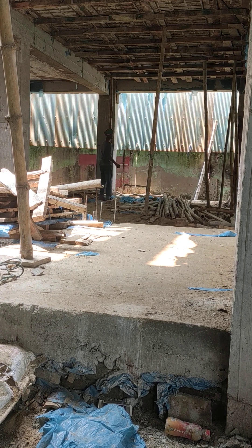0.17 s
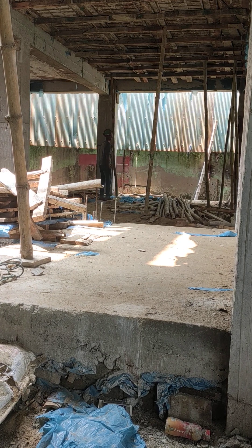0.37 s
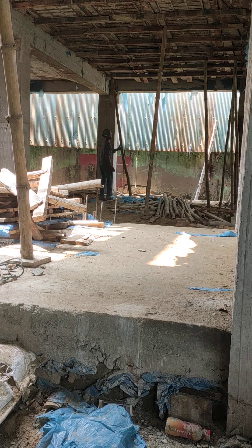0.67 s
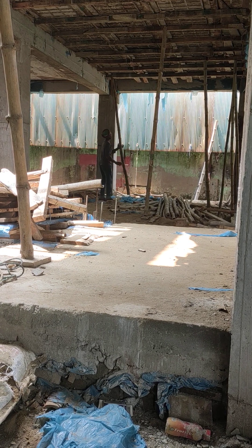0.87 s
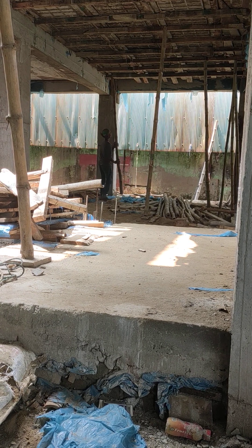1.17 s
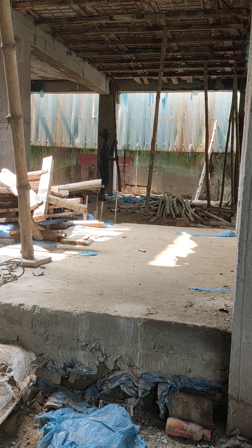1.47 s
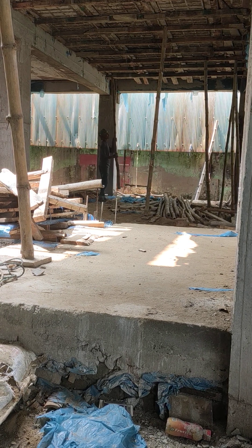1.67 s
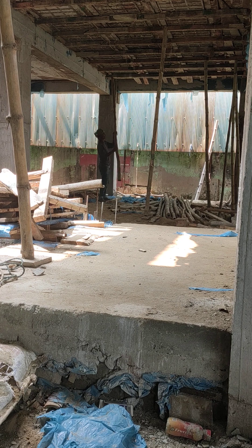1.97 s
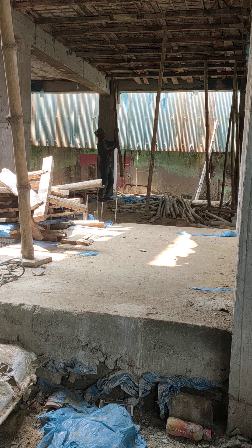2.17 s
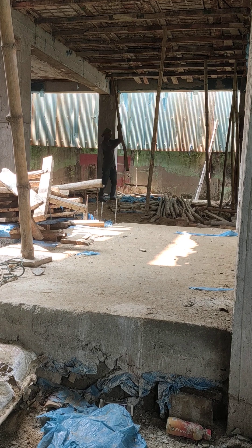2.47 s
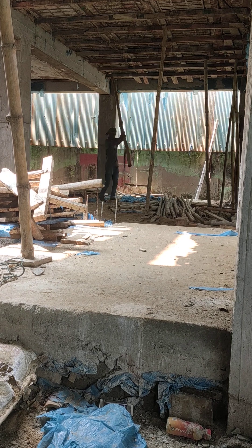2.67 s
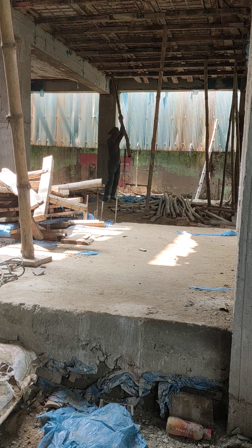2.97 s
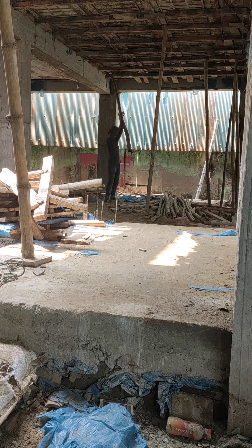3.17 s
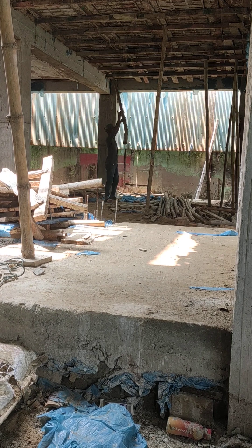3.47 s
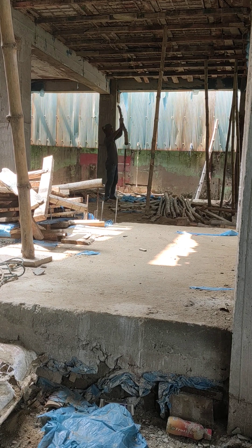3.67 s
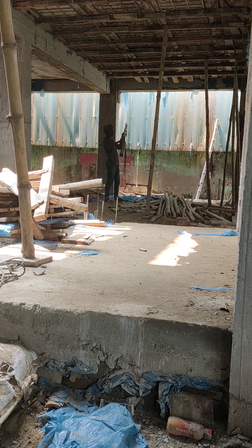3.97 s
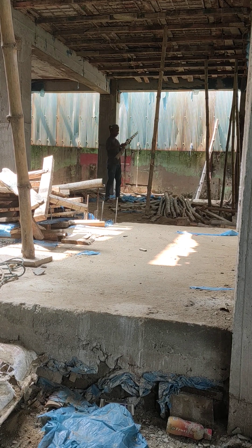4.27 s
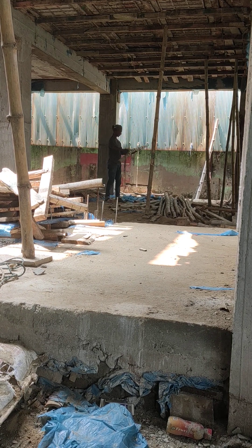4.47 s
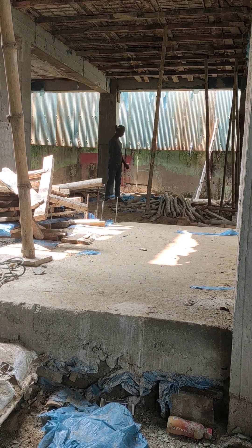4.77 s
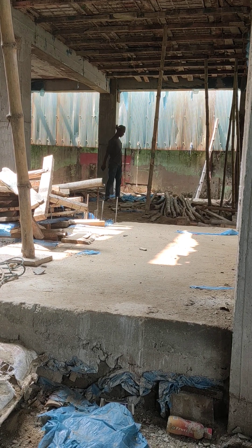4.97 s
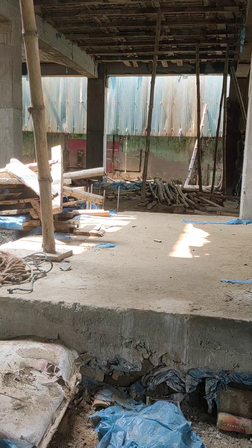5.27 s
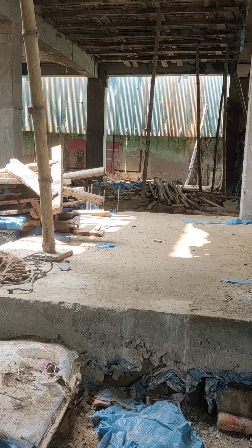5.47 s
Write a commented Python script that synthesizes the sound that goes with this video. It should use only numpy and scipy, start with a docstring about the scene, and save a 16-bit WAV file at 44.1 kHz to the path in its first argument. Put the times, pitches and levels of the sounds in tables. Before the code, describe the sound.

A pole rams wooden shuttering about twice a second in an echoing concrete shell, until a board works loose and clatters onto the floor.

```python
"""In a bare building a pole rams timber shuttering under a slab, twice a second: deck thumps, board rings, wood cracks.
A beam shades the blows, so their treble arrives only by echo; light taps and rebounds tick in between.
After six blows a board comes loose and knocks ever louder, then falls and clatters on the concrete.
The sound cuts out briefly in the crash's tail, which resumes for an instant; then only the site noise goes on,
with one low swell and a faint clunk. Bodies are dying sines, contacts shaped pulses, the hall decaying noise."""
import sys
import numpy as np
from scipy import signal
from scipy.fft import rfft, irfft
from scipy.io import wavfile

SR = 44100
rng = np.random.default_rng(int(sys.argv[2]) if len(sys.argv) > 2 else 0)


def wav_record(signal):
    """Record a signal, one row per channel, as 16-bit PCM in the file named by sys.argv[1]."""
    frames = np.transpose(np.atleast_2d(signal))
    bounded = np.clip(frames, -1, 1)
    # unit amplitude maps onto the largest positive 16-bit level
    quanta = np.round(bounded * 32767).astype(np.int16)
    wavfile.write(sys.argv[1], SR, quanta)


N = 247842
LEAD = SR // 2  # samples of run-in before time zero
TAIL_T = np.arange(3 * SR // 2) / SR  # s
HIT_T = TAIL_T[:SR // 5]  # s
LOOSE_AT_S = 3.0  # the board comes loose

# Pole blows. Each row: start in seconds, force in dB, crack tilt in dB/octave (0 square on, lower when
# glancing), favoured board mode in Hz.
BLOWS = [(-0.26, -9, -2.5, 824), (0.2246, -9, -3.5, 554), (0.7126, -6.5, 0.5, 1370),
         (1.2082, -6.5, -4, 1340), (1.6958, -5.5, -2.5, 1420), (2.1849, -4.5, 0, 1430),
         (2.665, -4.5, -1, 1460), (3.1368, -4, -3.5, 524), (3.6279, -4, 1.5, 1016), (4.097, -4.5, -1, 1020),
         (4.6225, -5.5, -6, 1020)]
# Spectrum of wood cracking on wood. Each row: frequency in Hz, level in dB.
CRACK = [(200, -19.5), (600, -1.5), (900, -1), (1300, 6.5), (2000, 0), (2900, 5), (4200, 3.5), (6000, 2.5),
         (8500, 4), (11000, -2), (13500, -4.5), (16000, -8.5)]


def amp(db):
    """Decibels to gain."""
    return 10 ** (np.asarray(db) / 20)


def unit(x):
    """Scales to energy one per channel, averaged over the channels."""
    return x / np.sqrt(np.mean(np.sum(x ** 2, -1)) + 1e-20)


def read(points, hz):
    """Joins table rows by straight lines on a log-frequency axis."""
    f, value = np.transpose(points)
    return np.interp(np.log(hz + 1), np.log(f + 1), value)


def add(track, start_s, sound):
    """Mixes a sound into a track that begins with the run-in."""
    part = track[max(round(start_s * SR) + LEAD, 0):][:len(sound)]
    part += sound[:len(part)]


def lowpass(x, hz, order=2):
    """Causal Butterworth low-pass."""
    sos = signal.butter(order, min(hz, SR / 2.1), fs=SR, output="sos")
    return signal.sosfilt(sos, x)


def pulse(spectrum, tilt_db_per_octave=0, size=4096):
    """Minimum-phase pulse of energy one with the given spectrum, tilted above the 64th bin."""
    hz = abs(np.fft.fftfreq(size, 1 / SR))
    octaves = np.log2(np.maximum(hz, SR / size * 64))
    log_gain = np.log(amp(read(spectrum, hz) + tilt_db_per_octave * octaves))
    # the Hilbert transform of the log gain gives the causal phase
    minimum_phase = np.exp(np.conj(signal.hilbert(log_gain)))
    return unit(np.fft.ifft(minimum_phase).real)


def ring(modes, tilt_db_per_octave=0, t=HIT_T):
    """Dying sines of a struck body, energy one; a harder contact tilts them upward."""
    total = np.zeros(len(t))
    for k, (hz, db, t60_s) in enumerate(modes):
        sine = unit(amp(-60 * t / t60_s) * np.sin(2 * np.pi * hz * t))
        total += (-1) ** k * amp(db + tilt_db_per_octave * np.log2(hz)) * sine
    return unit(total)


def diffuse(size, spacing_m=0.19):
    """Noise from all directions at two spaced microphones: alike in the bass, unrelated in the treble."""
    a, b = rfft(rng.standard_normal((2, size)))
    same = np.sinc(2 * np.fft.rfftfreq(size, 1 / SR) * spacing_m / 343)  # sound travels 343 m/s
    return irfft([a, same * a + np.sqrt(1 - same ** 2) * b], size)


def hall(first_s, build_s, echoes=(), scatter_s=0.0036):
    """Diffuse tail swelling from the first reflection, energy one; rough walls smear each strong echo."""
    # Each row: frequency in Hz, t60 in seconds.
    decay_times = [(80, 1.5), (260, 0.79), (700, 0.7), (1840, .62), (4500, 0.55), (6500, 0.44),
                   (10000, 0.44), (15000, 0.29)]
    t = TAIL_T
    hz, at_s, z = signal.stft(diffuse(len(t)), SR, nperseg=1024)
    decay = amp(-60 * at_s / read(decay_times, hz)[:, None])
    # even out each band's chance energy in the random noise
    weight = (decay * (at_s > first_s)) ** 2
    band_energy = (abs(z) ** 2 * weight).sum((0, 2)) / weight.sum(1)
    z /= np.sqrt(band_energy)[:, None]
    noise = signal.istft(z * decay, SR, nperseg=1024)[1][:, :len(t)]
    tail = unit(noise * np.clip((t - first_s) / build_s, 0, 1))
    for delay_s, db, lowest_hz in echoes:
        burst = unit(diffuse(len(t)) * (t > delay_s) * np.exp(-abs(t - delay_s) / scatter_s))
        tail += amp(db) * (burst - lowpass(burst, lowest_hz, order=1))
    return unit(tail)


def heard(track, response):
    """Convolves a track with a one- or two-channel response and drops the run-in."""
    return signal.fftconvolve(track[None], response, axes=1)[:, LEAD:LEAD + N]


def background(air_db=-47):
    """Dull steady noise of the open site, with one low swell."""
    # Each row: frequency in Hz, density in dB per Hz.
    air_spectrum = [(20, -6), (60, -6.5), (150, -16), (300, -21.5), (600, -24.5), (1200, -28.5),
                    (2500, -35.5), (5000, -41.5), (10000, -47), (15000, -50.5)]
    swell_at_s, rise_s, fall_s = 5.27, 0.096, 0.21  # linear rise, exponential fall
    swell_db, swell_top_hz = -40.5, 333
    t, hz = np.arange(N) / SR - swell_at_s, np.fft.rfftfreq(N, 1 / SR)
    shaped = irfft(rfft(diffuse(N)) * amp(read(air_spectrum, hz)), N)
    envelope = np.clip(t / rise_s, 0, 1) * np.exp(-np.maximum(t - rise_s, 0) / fall_s)
    swell = envelope * unit(lowpass(diffuse(N), swell_top_hz))
    return (amp(air_db) * unit(shaped) + amp(swell_db) * swell) * np.sqrt(N)  # energy to power


def scrap(start_s=5.31, level_db=-11.5, hall_db=-1.0):
    """A faint clunk: modes of a small piece of scrap nudged near the microphones."""
    # Each row: frequency in Hz, level in dB, t60 in seconds.
    scrap_modes = [(74, 0, 0.18), (676, -8, .16), (965, -21, .04), (1440, -22, 0.067), (2180, -22, .12)]
    track = np.zeros(N + LEAD)
    add(track, start_s, amp(level_db) * ring(scrap_modes))
    return track[LEAD:] + amp(hall_db) * heard(track, hall(first_s=.002, build_s=0.0067))


def rebounds(tick, tick_db):
    """The tight board throws the pole back for a second touch; a glancing blow throws it less."""
    delay_s, rebound_db, tilt_db_per_octave = 0.108, -6.5, -3.5  # dB against the force
    glance = 4.8  # dB per dB/octave of the blow's tilt
    for start_s, force_db, blow_tilt, _ in BLOWS:
        if start_s < LOOSE_AT_S:
            level_db = tick_db + force_db + rebound_db + glance * blow_tilt
            add(tick, start_s + delay_s, amp(level_db) * pulse(CRACK, tilt_db_per_octave))


def taps(ring_db=12, tick_db=7, ring_direct_db=-4, tick_direct_db=-20):
    """Light contacts of pole and loose fittings, and rebounds, in plain view: wood tick plus pole ring."""
    # Each row: start in seconds, tick in dB, tick tilt in dB/octave.
    contacts = [(1.644, -24.5, 10.5), (2.027, -28.5, 4.5), (2.117, -17, -0.5), (2.12, -6.5, -0.5),
                (2.49, -8, -4), (2.545, -20.5, -5.5)]
    # Each row: frequency in Hz, level in dB, t60 in seconds.
    pole_modes = [(900, -7.5, 0.051), (1084, -9, 0.014), (1293, 6, 0.023), (1440, 3, 0.038),
                  (1670, -16, 0.014), (3700, -22, 0.0051), (4660, -5, 0.0036)]
    tap_ring_db, softness = -12, 1.7  # softness: dB more ring per dB/octave of dullness
    tone, tick = np.zeros((2, N + LEAD))
    for start_s, contact_db, tilt in contacts:
        tone_db = ring_db + contact_db + tap_ring_db - softness * tilt
        add(tone, start_s, amp(tone_db) * ring(pole_modes))
        add(tick, start_s, amp(tick_db + contact_db) * pulse(CRACK, tilt))
    rebounds(tick, tick_db)
    near = hall(first_s=.002, build_s=0.024, echoes=[(.001, 0.5, 507), (.005, -4, 2510)], scatter_s=0.016)
    direct = amp(ring_direct_db) * tone + amp(tick_direct_db) * tick
    return heard(tone + tick, near) + direct[LEAD:]


def crash(ring_db=13, clatter_db=18.0, ring_t60_s=0.047, direct_db=-1):
    """The board lands edge first, then flat, and bounces; each new contact wakes a different mode."""
    # Each row: start in seconds, main ring in Hz, ring level in dB.
    contacts = [(4.763, 775, -3), (4.780, 2010, -4.5), (4.801, 1047, -6), (4.819, 766, 2.5),
                (4.839, 896, 1.5), (4.866, 1350, -6), (4.890, 495, -2), (4.941, 362, -4.5)]
    # Spectrum on concrete. Each row: frequency in Hz, level in dB.
    clatter_spectrum = [(35, -24), (60, -19), (187, -21), (231, -1.5), (433, -9.5), (475, -1.5), (642, -5),
                        (810, -3.5), (1120, 0), (1380, -1), (2590, -10), (5840, -16), (15500, -31.5)]
    # weak at the first touch, full at the second contact, then waning
    first_touch_db, fade_db_per_s = -5.5, 29
    out, flat_at_s = np.zeros((2, N)), contacts[1][0]
    for start_s, hz, mode_db in contacts:
        floor_db = first_touch_db if start_s < flat_at_s else -fade_db_per_s * (start_s - flat_at_s)
        tone, clatter = np.zeros((2, N + LEAD))
        add(tone, start_s, amp(ring_db + mode_db) * ring([(hz, 0, ring_t60_s)]))
        add(clatter, start_s, amp(clatter_db + floor_db) * pulse(clatter_spectrum))
        room = hall(first_s=0.00087, build_s=0.0073, echoes=[(.002, -9, 299)], scatter_s=0.0029)
        out += heard(tone + clatter, room)
        # the broad face of the board also sends its ring straight to the microphones
        out += amp(direct_db) * tone[LEAD:]
    return out


def struck_at(modes, favoured_hz, lift_db=4.5, octaves=0.075):
    """The place of a blow favours the modes that have a belly there."""
    lifted = []
    for hz, db, t60_s in modes:
        nearness = np.exp(-(np.log2(hz / favoured_hz) / octaves) ** 2)
        lifted.append((hz, db + lift_db * nearness, t60_s))
    return lifted


def splinter(crack, share=0.62, decay_s=0.0028):
    """Fibres give way one after another, differently at each blow: a short noise burst smears the crack."""
    fibres = share * unit(rng.standard_normal(len(HIT_T)) * np.exp(-HIT_T / decay_s))
    return unit(signal.fftconvolve(crack, signal.unit_impulse(len(HIT_T)) + fibres))


def knock(start_s):
    """Board knock, dB against the force and tilt in dB/octave: choked while tight, louder and brighter as play grows."""
    tight, freed = (-8.5, 0.26), (1.63, -1.97)
    play_db_per_s, play_tilt_per_s = 4.0, 3.4
    loose_s = start_s - LOOSE_AT_S
    if loose_s < 0:
        return tight
    return freed[0] + play_db_per_s * loose_s, freed[1] + play_tilt_per_s * loose_s


def softened(spectrum, force_db, full_force_db=-4.5, dull_above_hz=152, dull_per_db=1.5):
    """A weaker blow stays longer in contact, so its thump loses dB/octave per dB short of full force."""
    slope_db = dull_per_db * max(full_force_db - force_db, 0)
    return [(hz, db - slope_db * max(np.log2(hz / dull_above_hz), 0)) for hz, db in spectrum]


def blows(thump_db=11, knock_db=16, crack_db=10.0, direct_db=-5, shade_hz=520, floor_s=0.01269,
          floor_db=-2, standing_db=5, count=3):
    """Each blow flexes the deck, rings the board and cracks at the contact, heard round a beam and by echo."""
    # Each row: frequency in Hz, level in dB, t60 in seconds.
    board_modes = [(354.7, -7, 0.031), (502, -6, 0.025), (551.4, -1, 0.025), (857, -3, 0.0181),
                   (848, -7.5, 0.11), (929, -14, 0.016), (1019, -5, 0.038), (1293, 1.5, 0.015),
                   (1461, -2, 0.038), (1515, -3, 0.02), (1838, -7.5, 0.046), (1823, -5.5, 0.0087),
                   (2750, -35.5, 0.06)]
    # Standing waves between floor and slab. Each row: frequency in Hz, level in dB, t60 in seconds.
    standing_modes = [(58.6, -5.5, 2.3), (119.8, -20.5, 0.57), (173.6, -14.5, 3.9)]
    # Thump of the deck. Each row: frequency in Hz, level in dB.
    thump_spectrum = [(30, -29.5), (70, -8.5), (120, -3), (175, 4), (220, -5.5), (280, 1.5), (360, -4),
                      (450, -13.5), (800, -56.5), (3000, -67.5)]
    # Walls and columns; narrow faces mirror only treble. Each row: delay in seconds, energy in dB
    # against the tail, lowest frequency in Hz.
    wall_echoes = [(.0165, -9, 246), (.0225, -8.5, 693), (.0305, -6.5, 2790), (.038, -8, 600),
                   (.074, -14, 900), (.101, -26.5, 2010)]
    glance_scrape = 0.34  # a glancing blow tears more fibres: dB of crack per dB/octave of dullness
    tracks, push = np.zeros((count, N + LEAD)), np.zeros(N + LEAD)
    for k, (start_s, force_db, contact_tilt, favoured_hz) in enumerate(BLOWS):
        track = tracks[k % count]
        board_db, board_tilt = knock(start_s)
        thump = pulse(softened(thump_spectrum, force_db))
        board = ring(struck_at(board_modes, favoured_hz), board_tilt)
        crack = splinter(pulse(CRACK, contact_tilt))
        add(track, start_s, amp(thump_db + force_db) * thump)
        add(track, start_s, amp(knock_db + force_db + board_db) * board)
        add(track, start_s, amp(crack_db + force_db - glance_scrape * contact_tilt) * crack)
        add(push, start_s, amp([standing_db + force_db]))
    # only the bass bends round the beam; the floor mirrors it a moment later
    direct = amp(direct_db) * lowpass(signal.unit_impulse(len(TAIL_T)), shade_hz, order=5)
    mirrored = amp(floor_db) * np.roll(direct, round(floor_s * SR))
    hits = np.zeros((2, N))
    # blows take turns among a few random tails of the same hall
    for track in tracks:
        tail = hall(first_s=0.0064, build_s=0.019, echoes=wall_echoes)
        hits += heard(track, direct + mirrored + tail)
    # standing waves take a few round trips to build up
    boom = ring(standing_modes, t=TAIL_T) * (1 - np.exp(-TAIL_T / 0.038))
    return hits + heard(push, boom[None])


def scene(balance_db=0.8):
    """The sound cuts out, the crash's tail resumes briefly where it stopped, then only the background goes on."""
    dropout_at_s, resume_at_s, cut_at_s = 5.043, 5.148, 5.188
    work = blows() + taps() + crash()
    out = background() + scrap()
    dropout, resume, cut = (round(s * SR) for s in (dropout_at_s, resume_at_s, cut_at_s))
    out[:, :dropout] += work[:, :dropout]
    out[:, dropout:resume] = 0
    out[:, resume:cut] += work[:, dropout:dropout + cut - resume]
    return out * amp([[balance_db], [-balance_db]])


def record(dry, edge_hz=16050):
    """Hard clip at full scale, then a steep linear-phase low-pass."""
    edge = signal.firwin(511, edge_hz, window=("kaiser", 9), fs=SR)
    return signal.oaconvolve(np.clip(dry, -1, 1), edge[None], "same")


dry = scene()
out = record(dry)
wav_record(out)
```